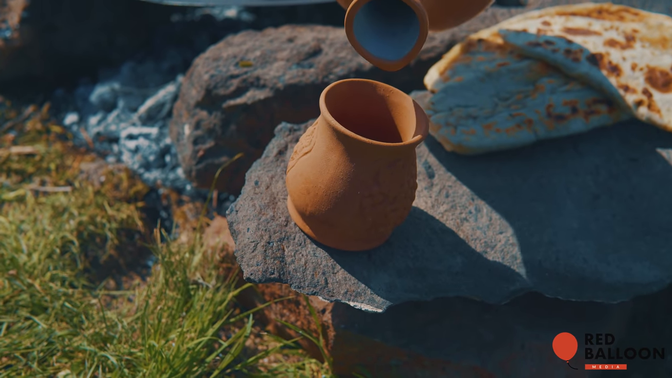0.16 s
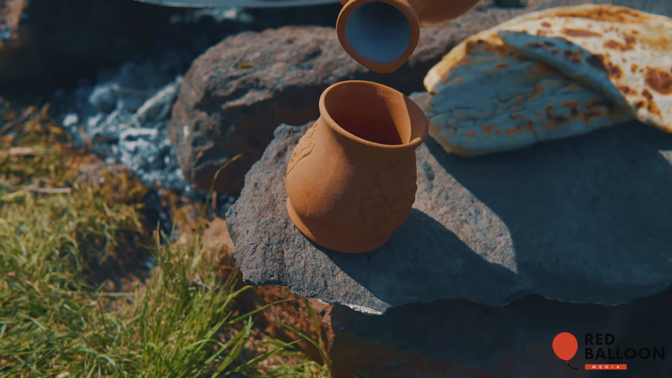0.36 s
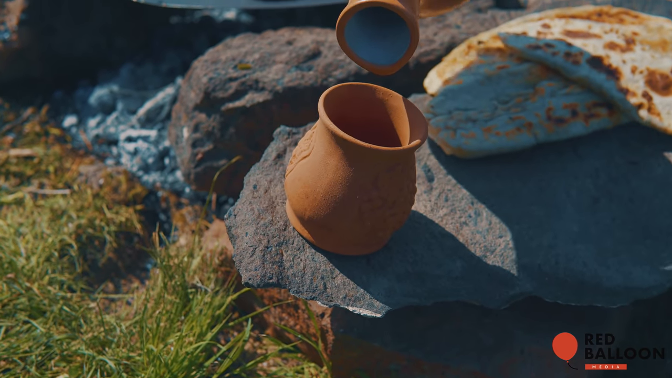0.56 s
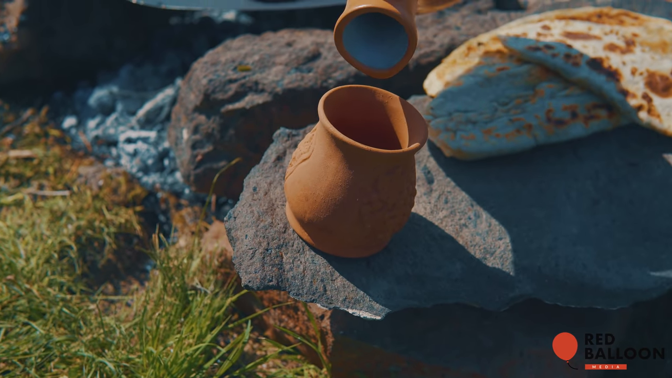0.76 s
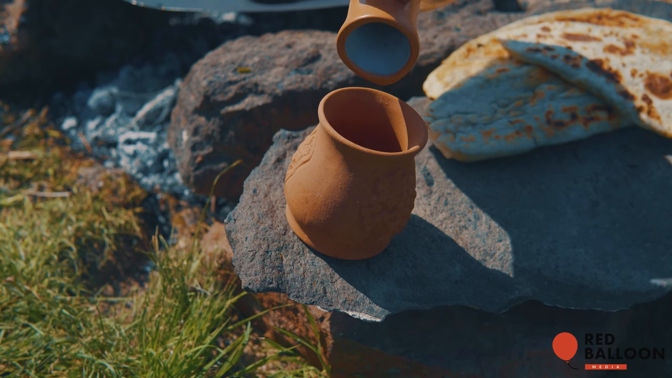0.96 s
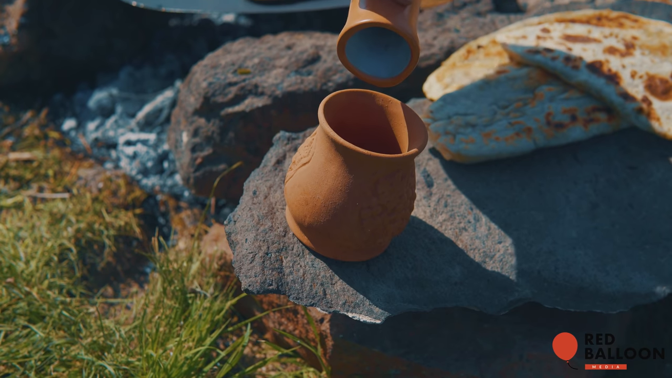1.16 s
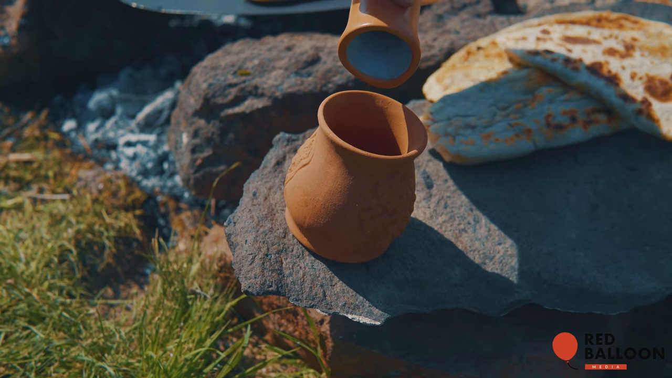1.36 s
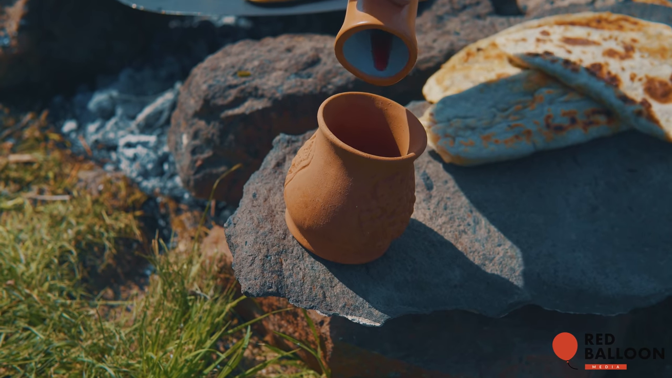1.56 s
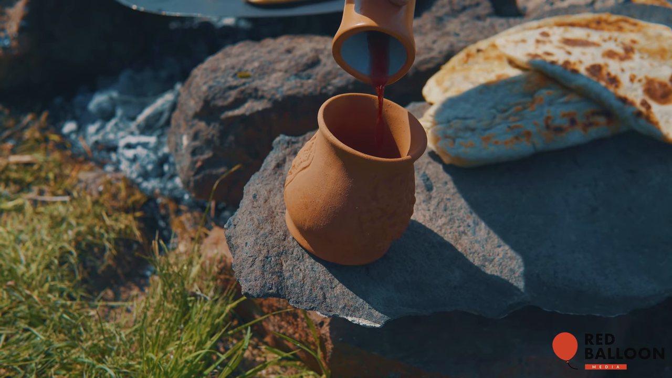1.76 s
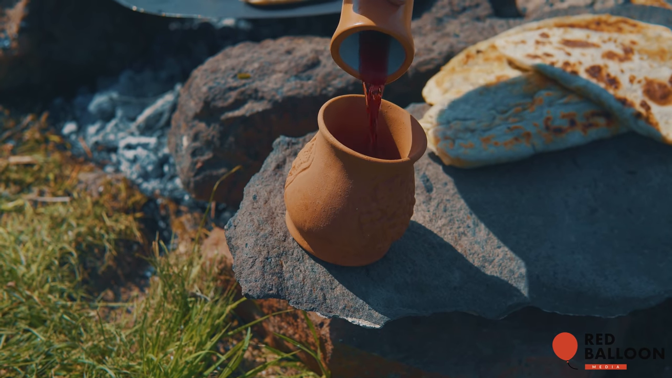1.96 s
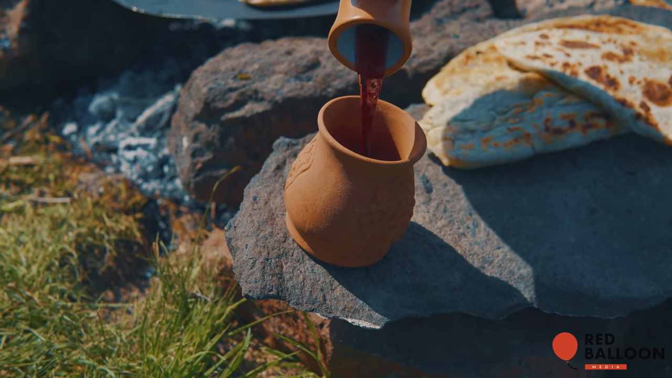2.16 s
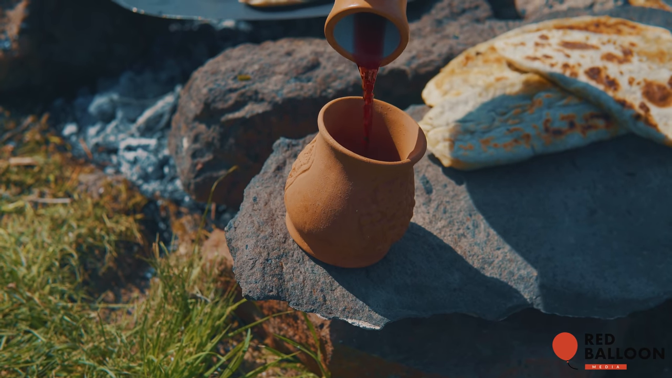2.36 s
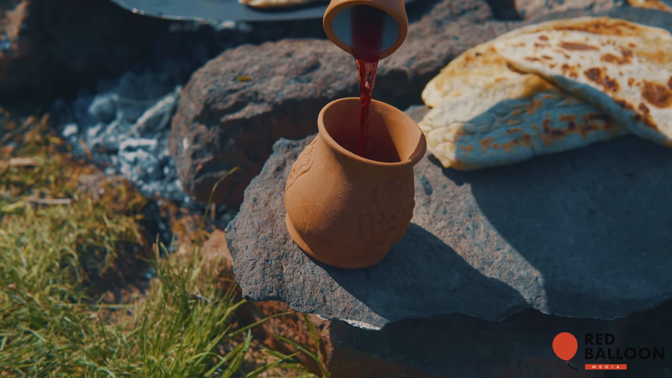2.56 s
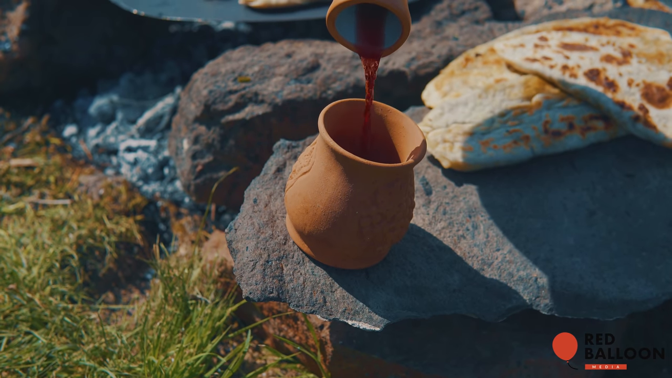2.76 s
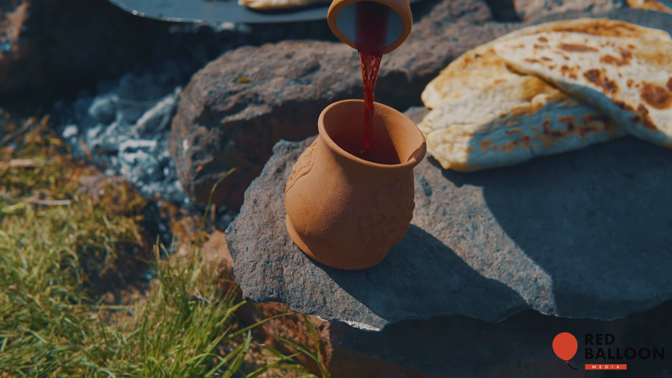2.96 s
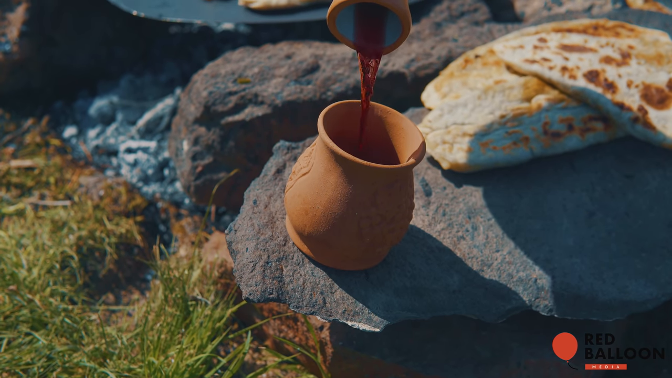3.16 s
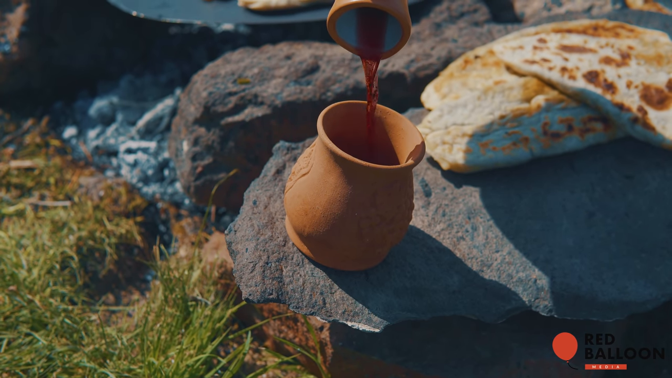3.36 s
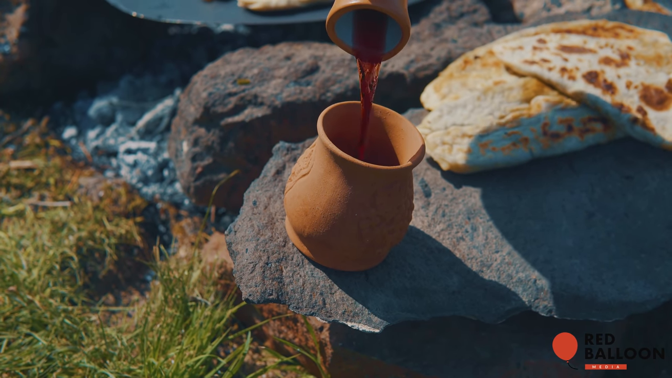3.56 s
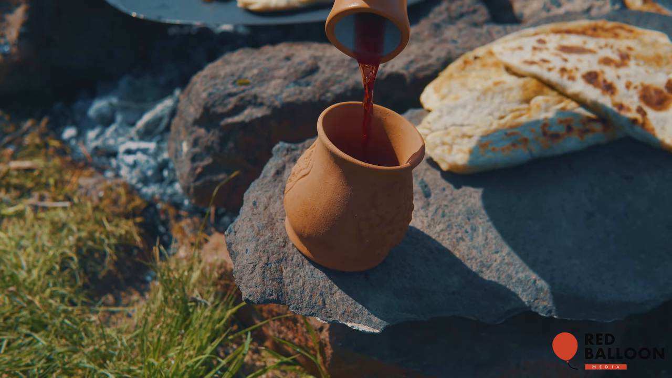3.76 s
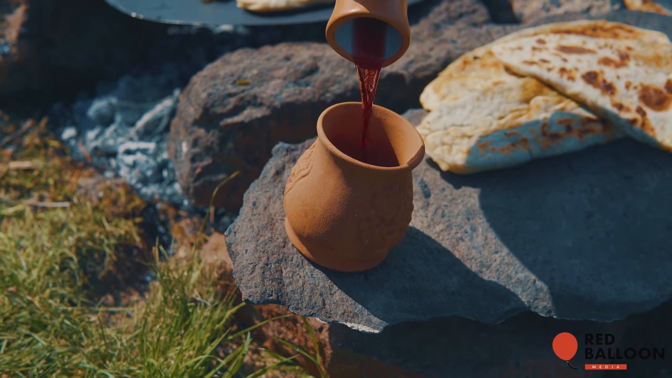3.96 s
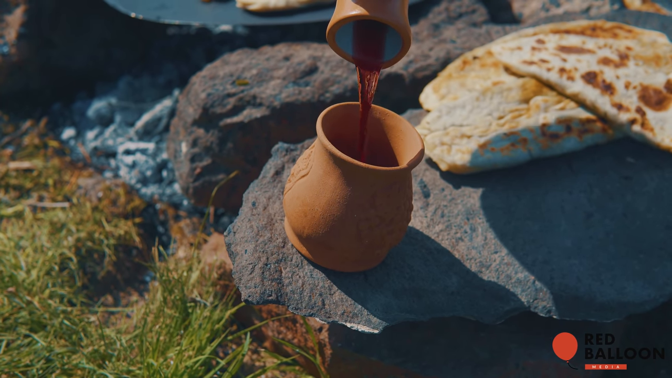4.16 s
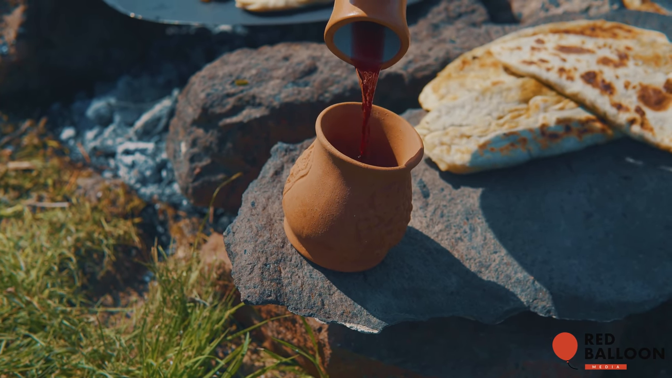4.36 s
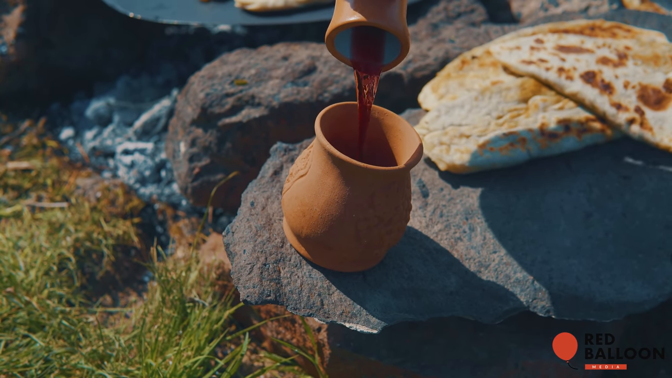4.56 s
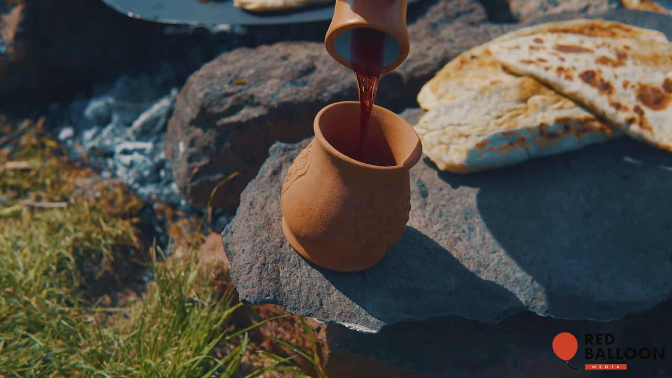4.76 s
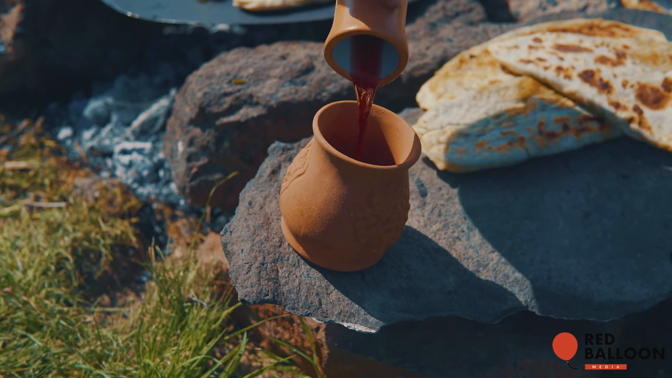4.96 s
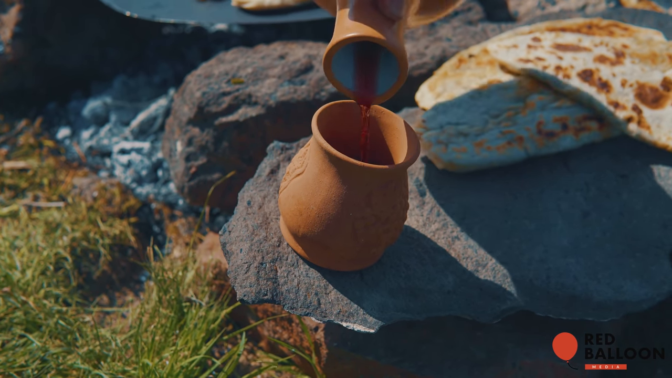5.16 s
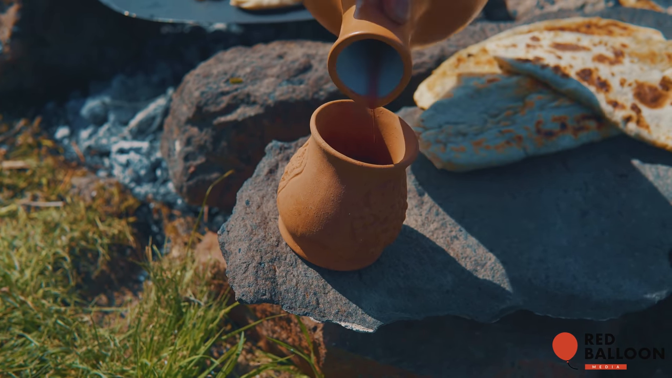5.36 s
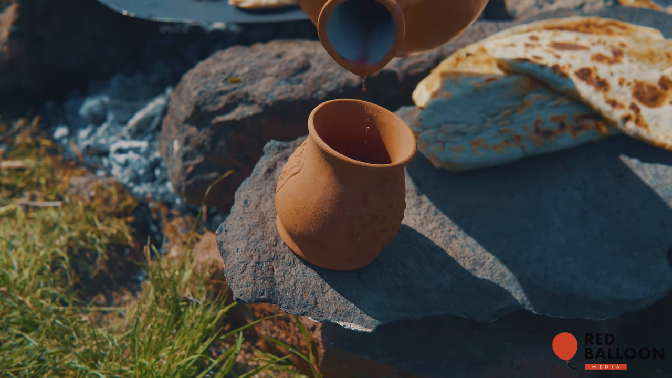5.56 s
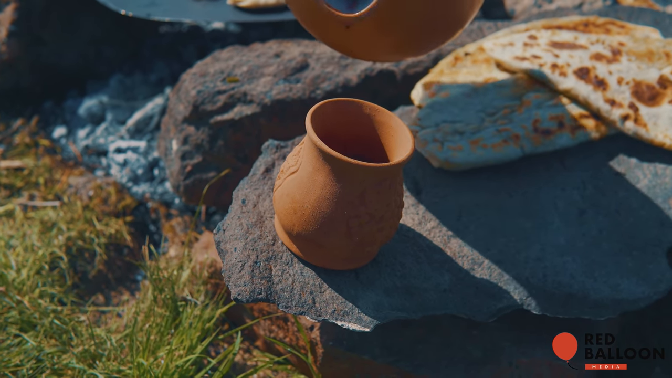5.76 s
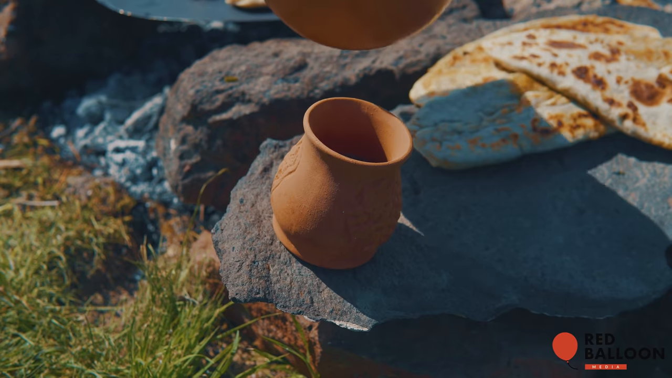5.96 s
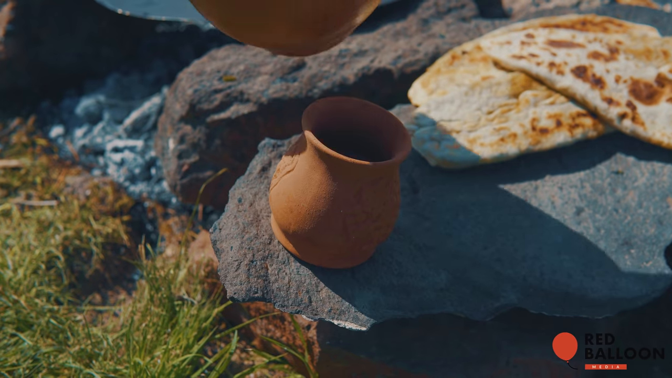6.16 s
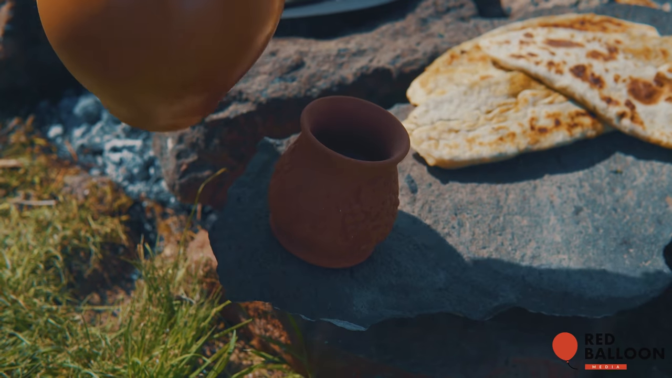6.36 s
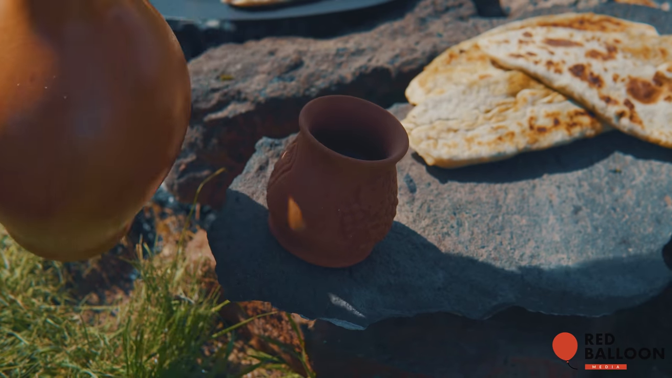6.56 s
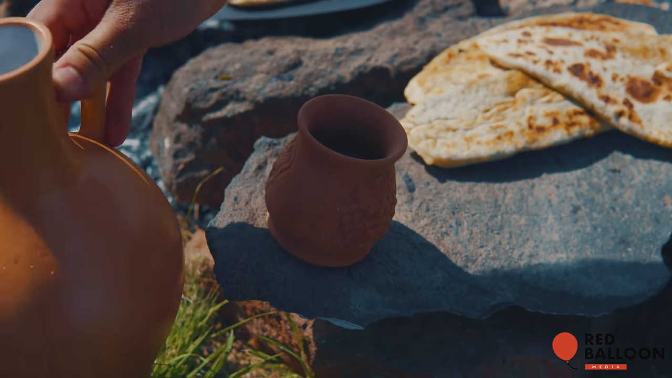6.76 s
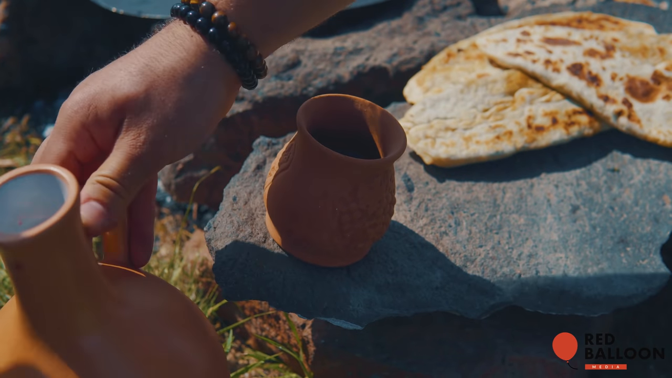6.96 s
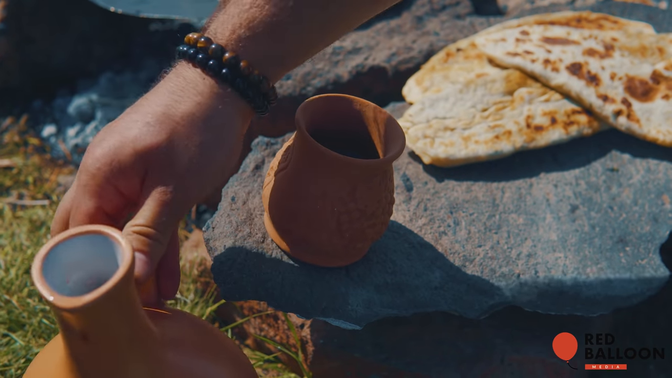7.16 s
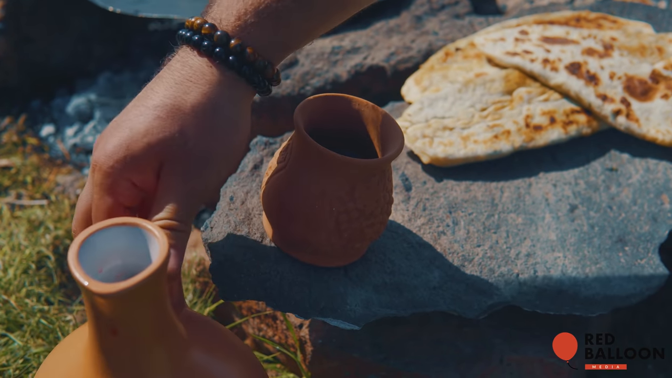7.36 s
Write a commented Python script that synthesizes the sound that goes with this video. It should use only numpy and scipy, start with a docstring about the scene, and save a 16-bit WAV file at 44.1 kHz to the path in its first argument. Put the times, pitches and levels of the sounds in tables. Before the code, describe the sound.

A close, quiet pour into a small clay cup, with a hard surface nearby giving a short dull echo. From 0 to 1.8 s there is only faint hiss, low murmur, slight electric hum and soft low puffs of air. At about 1.85 s a sharp tick of a first drop, then sparse tiny ticks and a faint knock near 2.2 s. Around 2.4 s the stream strikes bare clay with bright crackle and short rising glugs; by 3 s it splashes fully, then settles from 3.4 to 5.2 s into rounded gurgling and plops, fizz thinning, the cup's hollow pitch gradually rising while deeper bubbling sinks. Between 5.2 and 5.5 s it breaks into distinct plops, with last weak drips to 5.65 s. From 6 to 7.4 s fingers lightly knock and rub the jug, small dry ceramic clinks, densest at 6.3-6.85 s, with soft arm rustle and air puffs.

```python
"""A quiet room with a hard surface nearby: a drink is poured from a clay jug into a small clay cup, heard close.
Swarms of decaying sines make gurgle and splash, single ones plop and tick; gliding resonances follow the filling.
Fingers knock and rub the jug, mostly after the last drops: struck clay modes, and noise through the same modes.
Under it lie hiss, a low murmur, electric hum, puffs of draught and the rustle of an arm, from noise and sines."""
import sys
import numpy as np
from scipy import signal
from scipy.fft import rfft, irfft, next_fast_len
from scipy.io import wavfile
from scipy.ndimage import uniform_filter1d

SR = 44100
rng = np.random.default_rng(int(sys.argv[2]) if len(sys.argv) > 2 else 0)


def transcribe(u):
    """Save the signal u as a 16-bit wav file named by the first command-line argument.

    u: samples, shape (n,) or (channels, n), limited to [-1, 1]; the rate is SR.
    q: integer samples, one column per channel.
    """
    v = np.clip(np.atleast_2d(u).T, -1, 1)
    q = np.round(v * 32767).astype(np.int16)
    wavfile.write(sys.argv[1], SR, q)


N = 327354
TIME = np.arange(N) / SR

# The stream, on bare clay, into a deepening pool, then dribbling out.
# Each row: time in seconds, gurgle level in dB, splash level in dB, both before trims.
STREAM = [(2.34, -88, -84), (2.4, -81, -60), (2.48, -70.5, -64), (2.55, -54, -59.5), (2.65, -56.5, -64),
          (2.71, -69, -56.5), (2.8, -56.5, -61.5), (3.11, -55, -52), (3.27, -56, -64), (3.48, -49, -58),
          (3.59, -56.5, -60.5), (3.83, -52, -62), (4.14, -52.5, -62.5), (4.35, -57, -67.5),
          (4.62, -53, -62.5), (4.74, -57.5, -66.5), (5.3, -53.5, -64), (5.38, -69, -68), (5.66, -75, -76.5)]
# The filling cup. Each row: time in seconds, pitch of the air over the liquid in Hz, pitch of the bubble
# cloud in Hz, drive of the low resonances in dB, drive of the clay wall in dB.
FILLING = [(1.8, 800, 720, -4, 7.5), (2.5, 853, 880, -11, 1.5), (3.4, 882, 703, -6.5, 2.5),
           (3.9, 926, 580, 8.5, -1), (4.4, 940, 536, 9, 5), (4.8, 1143, 483, 4, 2),
           (5.3, 1227, 442, 6.5, -7), (5.45, 1210, 450, -11, -7)]
# Clay modes of the jug. Each row: frequency in Hz, relative level in dB, t60 in seconds.
JUG_MODES = [(2660, 0.5, 0.1), (2730, 0, 0.091), (3070, 0.5, 0.14), (3530, 4, 0.14), (3470, -8, 0.089),
             (3560, 0.5, 0.063), (4314, 3, 0.035), (4850, -6, 0.17), (5260, -5.5, 0.047), (5210, 2, 0.083),
             (5700, 7, 0.1), (6270, 5, 0.052), (7000, -5, 0.16), (7160, 0, 0.12), (7650, 5, 0.063),
             (8840, 7, 0.076)]


def gain_of(db):
    """Decibels to amplitude."""
    return 10 ** (np.asarray(db) / 20)


def evened(x):
    """Scales to rms 1."""
    return x / np.sqrt(np.mean(x ** 2) + 1e-20)


def steadied(x, size=4400):
    """Scales to rms 1 over about a tenth of a second; quicker bursts remain."""
    power = signal.oaconvolve(x ** 2, np.hanning(2 * size) / size, "same")
    return x / np.sqrt(abs(power) + 1e-20)


def read(points, hz):
    """Reads a table on a log-frequency axis."""
    f, value = np.transpose(points)
    return np.interp(np.log(hz + 1), np.log(f + 1), value)


def level(rows, axis=1):
    """One dB column of a curve as a gain per sample, silent outside it."""
    rows = np.array(rows, float)
    return gain_of(np.interp(TIME, rows[:, 0], rows[:, axis], left=-np.inf, right=-np.inf))


def held(rows, axis=1):
    """One dB column of a curve as a gain per sample, held beyond its ends."""
    rows = np.array(rows, float)
    return gain_of(np.interp(TIME, rows[:, 0], rows[:, axis]))


def swells(rows, fade_s):
    """Gain per sample of events (s, length s, .., dB) that fade in, hold and fade out."""
    out = np.zeros(N)
    for s, length, *_, db in rows:
        inside = np.minimum(TIME - s, s + length - TIME)
        out += gain_of(db) * np.sin(np.pi / 2 * np.clip(inside / fade_s, 0, 1))
    return out


def wander(per_s):
    """Smooth chance of rms 1 that changes about per_s times a second."""
    steps = uniform_filter1d(rng.standard_normal(int(N / SR * 4 * per_s) + 8), 4)
    return evened(np.interp(TIME * 4 * per_s, np.arange(len(steps)), steps))


def add(mix, s, sound):
    """Mixes a sound in at a time."""
    part = mix[max(round(s * SR), 0):][:len(sound)]
    part += sound[:len(part)]


def colour(x, points, size=4096):
    """Causal minimum-phase filter with the given spectrum, so that attacks stay sharp."""
    log_gain = np.log(gain_of(read(points, abs(np.fft.fftfreq(size, 1 / SR)))))
    taps = np.fft.ifft(np.exp(np.conj(signal.hilbert(log_gain)))).real
    return signal.oaconvolve(x, taps[:size // 2])[:N]


def noise(points):
    """Steady noise of rms 1 with the given spectrum."""
    size = next_fast_len(N)
    spectrum = rfft(rng.standard_normal(size))
    spectrum = spectrum * gain_of(read(points, np.fft.rfftfreq(size, 1 / SR)))
    return evened(irfft(spectrum, size)[:N])


def resonate(x, hz, width_hz):
    """A resonance of gain 1 that follows the curve hz."""
    turn = np.exp(2j * np.pi * np.cumsum(hz) / SR)
    r = np.exp(-np.pi * width_hz / SR)
    # shift to 0 Hz, one-pole low-pass, shift back
    return 2 * (turn * signal.lfilter([1 - r], [1, -r], x / turn + 1e-18)).real


def ring(modes, size=12000):
    """Response to one tap: a sum of exponentially decaying modes (Hz, dB, t60 s)."""
    t = np.arange(size) / SR
    return sum(gain_of(db) * np.exp(-np.log(1000) * t / t60) * np.cos(2 * np.pi * hz * t)
               for hz, db, t60 in modes)


def hum():
    """Electric hum: steady sines."""
    # Each row: frequency in Hz, rms level in dB.
    partials = [(100, -65.5), (200, -85.5)]
    return sum(gain_of(db) * np.sqrt(2) * np.sin(2 * np.pi * (hz * TIME + rng.random()))
               for hz, db in partials)


def draught(fade_s=0.078, calm_db=-62):
    """Puffs of air at the microphone: low noise that swells over a calm level."""
    # Each row: start in seconds, length in seconds, level in dB.
    puffs = [(.27, 0.17, -54.5), (.86, 0.16, -54), (1.12, 0.099, -51), (2.9, 0.72, -53.5), (3.38, .16, -46),
             (4.78, 0.092, -49.5), (5.33, 0.16, -53), (5.53, 0.13, -50), (6.16, 0.096, -45),
             (6.25, 0.54, -53), (6.39, 0.15, -43.5), (6.78, 0.13, -42), (6.95, .55, -57.5)]
    # Each row: frequency in Hz, density in dB per Hz.
    air_colour = [(8, -8), (22, -1.5), (36, 0), (55, -6.5), (80, -12), (120, -33), (200, -42), (500, -59.5)]
    return np.hypot(gain_of(calm_db), swells(puffs, fade_s)) * steadied(noise(air_colour))


def arm_rustle():
    """The arm's soft rustle as it carries the jug away: shaped noise."""
    # Each row: time in seconds, level in dB.
    rustle = [(5.8, -67.5), (6.2, -72.5), (6.6, -68.5), (7.0, -67.5), (7.42, -78)]
    return level(rustle) * noise([(60, -9.5), (150, -1.5), (260, -29.5), (700, -17.5), (1800, -30.5), (8000, -33)])


def background(hiss_db=-69.5, murmur_db=-69.5):
    """Even hiss and a low murmur of air as steady noise, with hum, draught and the moving arm."""
    # Each row: frequency in Hz, density in dB per Hz.
    hiss_colour = [(76, -32), (130, 3.5), (166, -3), (207, -10), (228, -9.5), (268, -8.5), (554, -14.5),
                   (706, -12.5), (796, -15), (2720, -19), (3330, -19), (6470, -19.5), (15100, -19),
                   (16000, -34.5)]
    hiss = gain_of(hiss_db) * noise(hiss_colour)
    murmur = gain_of(murmur_db) * noise([(40, -18), (80, 0.5), (115, 1.5), (150, -7), (220, -16.5), (500, -69)])
    return hiss + murmur + hum() + draught() + arm_rustle()


def jug_knocks(scuff_s=0.0055, soft_finger_s=0.0016):
    """Fingers knock the jug: its modes ring strongest around one frequency, with a dry noise scuff."""
    # Each row: start in seconds, peak level in dB, frequency in Hz around which it rings most,
    # dB lost an octave from there, scuff level in dB before colouring, pitch factor of the grip.
    knock_rows = [(2.215, -59, 2860, 38, -66, 0.95), (5.997, -53, 2660, 28, -55, 1.02),
                  (6.182, -66.5, 3470, 25, -74, 0.91), (6.345, -57, 3400, 0, -65, 1.02),
                  (6.436, -48, 3180, 5, -71, 0.98), (6.576, -53, 5700, 27, -55, 1),
                  (6.609, -51.5, 3030, 23, -52, 1), (6.701, -65, 2660, 27, -53.5, 1.1),
                  (6.843, -57.5, 3570, 35, -74, .985), (7.384, -57, 5500, 1, -65, 1.1)]
    # Each row: frequency in Hz, density in dB per Hz.
    scuff_colour = [(200, -12), (800, -3), (1400, 3.5), (1900, 7.5), (2500, 3), (3200, -2), (8000, -6),
                    (16000, -20)]
    knocks, scuffs, t = np.zeros(N), np.zeros(N), np.arange(12000) / SR
    for s, db, hz, focus_db, scuff_db, shift in knock_rows:
        modes = [(f * shift, mode_db - focus_db * abs(np.log2(f / hz)) ** .5, t60)
                 for f, mode_db, t60 in JUG_MODES]
        tone = ring(modes) * (1 - np.exp(-t / soft_finger_s))
        add(knocks, s, gain_of(db) * tone / abs(tone).max())
        add(scuffs, s, gain_of(scuff_db) * rng.standard_normal(len(t)) * np.exp(-t / scuff_s))
    return knocks + colour(scuffs, scuff_colour)


def jug_rubs(fade_s=0.031, grip_detune=0.0114, dull_db_per_octave=7):
    """Fingers slide on the jug: friction noise drives its modes, which the shifting grip favours by turns."""
    # Each row: start in seconds, length in seconds, level in dB.
    rubs = [(6.18, 0.22, -76.5), (6.34, 0.21, -70.5), (6.55, 0.099, -65), (6.82, 0.063, -72.5),
            (6.97, 0.31, -72), (7.32, .14, -70)]
    friction, sung = rng.standard_normal(N), np.zeros(N)
    for hz, db, t60 in JUG_MODES:
        grip = wander(per_s=7)
        favour_db = db + 6 * np.clip(grip, -2, 1) - dull_db_per_octave * np.log2(hz / 3000)
        width_hz = np.log(1000) / np.pi / t60
        sung += gain_of(favour_db) * resonate(friction, hz * (1 + grip_detune * grip), width_hz)
    return swells(rubs, fade_s) * steadied(sung)


def bubble(hz, ring_ms, rise=0.0036):
    """A trapped bubble swells, rings and dies; its pitch creeps up as it nears the surface."""
    life_s = ring_ms / 1000
    u = np.arange(int(5 * life_s * SR) + 2) / (life_s * SR)  # time in lives
    swell = u ** .7 * np.exp(-u ** 1.4) * np.tanh(8 * u) / .43
    return swell * np.sin(2 * np.pi * np.cumsum(hz * (1 + rise * (u - 1))) / SR)


def swarm(per_s, low_hz, high_hz, cycles, spread_db, count=40):
    """Many small bubbles at random moments, most weak and a few strong."""
    size = gain_of(spread_db * np.minimum(rng.exponential(1, N), 3.5)) * (rng.random(N) < per_s / SR)
    size *= level(STREAM) > 0  # only while the stream runs
    kind, lives, out = rng.integers(0, count, N), rng.uniform(0.25, 2.34, count), np.zeros(N)
    for k, hz in enumerate(np.geomspace(low_hz, high_hz, count)):
        grain = evened(bubble(hz, 1000 * cycles * lives[k] / hz))
        for at in np.flatnonzero((kind == k) & (size > 0)):
            add(out, at / SR, size[at] * grain)
    return out


def depths(x, cloud_db, neck_db, cloud_width_hz=60, neck_hz=675., neck_width_hz=40):
    """Low resonances: the bubble cloud mostly sinks in pitch as it deepens, the neck of the cup stays put."""
    s, _, cloud_hz, *_ = np.transpose(FILLING)
    x = x * held(FILLING, axis=3)
    cloud = resonate(x, np.interp(TIME, s, cloud_hz), cloud_width_hz)
    neck = resonate(x, np.full(N, neck_hz), neck_width_hz)
    return gain_of(cloud_db) * cloud + gain_of(neck_db) * neck


def pocket(churn, width_hz=130, fade_s=0.036):
    """Glugs: the stream digs air pockets in the pool, resonances whose pitch climbs as they close."""
    # Each row: start in seconds, length in seconds, first pitch in Hz, last pitch in Hz, relative level in dB.
    glugs = [(2.483, 0.057, 1300, 1450, 14), (2.558, 0.14, 940, 1600, 7), (2.825, .14, 950, 1550, 13),
             (3.07, .11, 950, 1850, 12), (3.222, .16, 860, 1070, 6)]
    glide = []
    for s, length, first_hz, last_hz, _ in glugs:
        glide += [(s, first_hz), (s + length, last_hz)]
    return swells(glugs, fade_s) * resonate(churn, np.interp(TIME, *np.transpose(glide)), width_hz)


def gurgle(trim_db=-1.5, air_db=6, air_width_hz=110, pocket_db=5, pips_db=-9):
    """Churning bubbles sound the air in the cup, the depths and the pockets; small bubbles pip through."""
    # Each row: frequency in Hz, filter gain in dB.
    churn_colour = [(200, -27.5), (420, -12.5), (570, -10.5), (690, 0), (790, -1), (1050, 4.5), (1300, 2),
                    (1500, -1.5), (1750, 3), (1870, -4), (2250, -4.5), (2500, 6), (4000, -47.5)]
    s, air_hz, *_ = np.transpose(FILLING)
    churn = swarm(per_s=750, low_hz=514, high_hz=1995, cycles=0.72, spread_db=4.5)
    churn = evened(colour(churn, churn_colour))
    pips = swarm(per_s=260, low_hz=1100, high_hz=2570, cycles=8.7, spread_db=9)
    pips = evened(colour(pips, churn_colour))
    body = churn + gain_of(air_db) * resonate(churn, np.interp(TIME, s, air_hz), air_width_hz)
    body += gain_of(pocket_db) * pocket(churn)
    body += depths(churn, cloud_db=10.5, neck_db=-1) + gain_of(pips_db) * pips
    return level(STREAM, axis=1) * gain_of(trim_db) * steadied(body)


def splash(fine_db=-1.9, fine_fall_db_per_s=0.75, clump_db=4.5, hollow_db=-38):
    """Small bubbles crackle in clumps, the finest fizz less as the pool deepens; both sound the cup's hollow."""
    # Higher resonances of the air in the cup. Each row: frequency in Hz, relative level in dB, t60 in seconds.
    hollow_modes = [(2080, -12, .02), (2560, -5, .04), (3100, 0, .03), (3380, -6, .02), (4400, -7, .02),
                    (5300, -2, .016), (5650, -1, .02), (7300, -6, .016), (8320, 3, .022), (9560, -1, .022),
                    (10200, -4, .016)]
    # Each row of both colours: frequency in Hz, filter gain in dB.
    crackle_colour = [(1500, -19), (2100, -9), (2480, -18.5), (2750, -8.5), (3150, -2.5), (3750, -1.5),
                      (4600, -1), (5600, 3.5), (6400, -7.5), (7200, 0), (9000, -47)]
    spray_colour = [(5000, -34), (7000, -11), (8300, -5), (8900, -15), (9600, -7.5), (10800, -7.5),
                    (12000, -1), (15000, -7), (16000, 8)]
    clumps = gain_of(clump_db * wander(per_s=60))
    coarse = clumps * swarm(per_s=1500, low_hz=1900, high_hz=7500, cycles=2.2, spread_db=4.8)
    fine = clumps * swarm(per_s=1300, low_hz=6500, high_hz=16000, cycles=3.6, spread_db=5.5)
    hollow = gain_of(hollow_db) * ring(hollow_modes)
    coarse, fine = (x + signal.oaconvolve(x, hollow)[:N] for x in (coarse, fine))
    crackle = steadied(colour(coarse, crackle_colour))
    fizz_gain = gain_of(fine_db - fine_fall_db_per_s * (TIME - STREAM[0][0]))
    fizz = fizz_gain * steadied(colour(fine, spray_colour))
    return level(STREAM, axis=2) * (crackle + fizz)


def stray_plops(count=40, first_s=3.25, last_s=5.18, over_db=8, spread_db=2, scatter=.06, ring_ms=4.9):
    """Lesser large bubbles at random, tuned near the air in the cup; their strength follows the gurgle."""
    when, size, tune, life = rng.uniform(-1, 1, (count, 4)).T
    s = first_s + (last_s - first_s) * (np.arange(count) + .5 + when) / count
    db = np.interp(s, *np.transpose(STREAM)[:2]) + over_db + spread_db * size
    hz = np.interp(s, *np.transpose(FILLING)[:2]) * (1 + scatter * tune)
    return list(zip(s, db, hz, ring_ms * 2 ** life))


def stray_ticks(count=40, first_s=2.2, last_s=5.35, thinning=1.8, over_db=15.5, spread_db=3,
                low_hz=4500, high_hz=12500, cycles=2.7):
    """Lesser tiny bubbles at random; strength follows the splash, and they thin out as the pool deepens."""
    when, size, tune, life = rng.random((count, 4)).T
    s = first_s + (last_s - first_s) * ((np.arange(count) + when) / count) ** thinning
    flow_s, _, splash_db = np.transpose(STREAM)
    db = np.interp(s, flow_s, splash_db) + over_db + spread_db * (2 * size - 1)
    hz = low_hz * (high_hz / low_hz) ** (tune ** 2)
    return list(zip(s, db, hz, 1000 * cycles * 2 ** (2 * life - 1) / hz))


def plops(snap_db=-23, snap_ms=0.79, push_db=22):
    """Each distinct bubble starts with a tiny snap as the surface closes over it, and stirs the depths."""
    # Bubbles and drops that stand out.
    # Each row: start in seconds, peak level in dB, pitch in Hz, ring time in ms.
    distinct = [(1.832, -49, 14500, 0.43), (1.8324, -52, 750, 3.2), (1.859, -28, 5260, 0.81),
                (1.8592, -62.5, 715, 7.1), (2.0878, -47.5, 7600, 0.66), (2.1076, -52, 7250, 0.61),
                (2.147, -46, 10260, 1.1), (2.232, -61.5, 520, 4.7), (2.4062, -40, 4760, 2),
                (2.4604, -41, 8300, 0.79), (2.5297, -34, 1080, 1.16), (2.57, -40, 8300, 1.3),
                (2.6144, -36, 8260, 2.4), (2.6168, -29.5, 9770, 0.53), (2.633, -43.5, 1000, 3.2),
                (2.6702, -39.5, 835, 5.4), (2.7165, -39, 5260, 0.85), (2.7413, -38.5, 9400, .61),
                (2.7472, -45.5, 3120, 4.5), (2.749, -43, 1484, 3.4), (2.8553, -36, 1015, 2.8),
                (2.9419, -36, 13200, 0.81), (2.9429, -43.5, 1120, 3.7), (3.0052, -41, 2040, 1.5),
                (3.0066, -30.5, 5440, 0.33), (3.007, -43.5, 3070, 4.5), (3.0525, -32, 885, 4.8),
                (3.0748, -42, 3020, 5.7), (3.0851, -33.5, 940, 4.1), (3.0938, -32.5, 8030, 0.72),
                (3.104, -37, 12100, 1.2), (3.1613, -35.5, 4500, 0.59), (3.1669, -37.5, 1060, 2),
                (3.1972, -37, 902, 7.5), (3.2175, -35.5, 846, 5.6), (3.4168, -32.5, 850, 4),
                (3.4385, -34.5, 896, 4.8), (3.4717, -34.5, 840, 2.5), (3.4724, -36, 8050, 0.41),
                (3.5135, -27.5, 885, 6), (3.5328, -39.5, 894, 10), (3.586, -39.5, 915, 3.7),
                (3.6285, -28.5, 860, 2.7), (3.6566, -33.5, 910, 2.9), (3.657, -37.5, 10800, .1),
                (3.7074, -39, 704, 1.7), (3.818, -39.5, 12700, 0.082), (3.8268, -36.5, 850, 4.4),
                (3.8505, -36, 887, 4.1), (3.906, -38, 865, 2.2), (3.9324, -31, 910, 2.2),
                (4.0333, -32, 870, 3.2), (4.0605, -41, 940, 3), (4.1677, -43, 835, 1.7),
                (4.2315, -41.5, 1014, 10.4), (4.3261, -43.5, 10700, 0.77), (4.4557, -43.5, 945, 1.9),
                (4.4892, -43.5, 870, 1.4), (4.5392, -43, 835, 1.1), (4.5938, -36.5, 13600, .2),
                (4.5947, -39, 960, 1.54), (4.8206, -44, 1050, 5.9), (4.823, -43.5, 11100, 0.4),
                (4.8394, -38.5, 1170, 1.2), (4.9726, -40, 1190, 3.1), (5.0009, -36, 1100, 1.3),
                (5.1077, -38, 1140, 2), (5.1373, -42.5, 11340, 0.83), (5.189, -37, 1156, 4),
                (5.2166, -35.5, 1180, 2.4), (5.217, -42.5, 13000, 0.73), (5.2262, -35.5, 1200, 6),
                (5.2678, -41.5, 5770, 0.5), (5.2779, -32.5, 1250, 1.9), (5.282, -43, 3300, .58),
                (5.308, -34, 1150, 3.4), (5.3085, -40.5, 567, 1.7), (5.355, -40, 1155, 3.5),
                (5.405, -54, 2520, 10), (5.4166, -36, 1650, 0.45), (5.426, -31.5, 1510, 2.2),
                (5.454, -29.5, 1215, 2), (5.4639, -29, 1135, 4.1), (5.4886, -38, 1040, 3.2),
                (5.557, -60, 1100, 7.1), (5.579, -58, 1220, 6), (5.6031, -48, 7600, 0.57),
                (5.611, -52.5, 1570, 2.7), (5.642, -63, 1690, 4.9)]
    tones, snaps, pushes = np.zeros((3, N))
    u = np.arange(500) * 1000 / SR / snap_ms
    bubbles = list(distinct) + stray_plops() + stray_ticks()
    bursts = rng.standard_normal((len(bubbles), len(u))) * u * np.exp(1 - u)
    for (s, db, hz, ring_ms), burst in zip(bubbles, bursts):
        add(tones, s, gain_of(db) * bubble(hz, ring_ms))
        abruptness_db = read([(.2, 16.5), (2.5, -5), (7, -5)], ring_ms)  # short-lived bubbles snap harder
        add(snaps, s, gain_of(db + snap_db + abruptness_db) * burst)
        # one-sample impulse: large bubbles shove the liquid
        add(pushes, s, gain_of([db + push_db + abruptness_db]) * min(1, 1000 / hz) ** 2)
    snaps = colour(snaps, [(250, -19), (700, -7), (1400, -4), (2400, -9),
                           (3200, 1), (5500, 4), (6800, 6.0), (13000, 2.5)])
    pushes = colour(pushes, [(280, -19.5), (470, 0.0), (620, 0), (2000, 0)])
    return tones + snaps + depths(pushes, cloud_db=2.5, neck_db=3)


def cup(liquid, wall_db=-53):
    """The liquid sets the clay wall ringing, more or less freely as the cup fills."""
    # Clay modes of the cup. Each row: frequency in Hz, relative level in dB, t60 in seconds.
    wall_modes = [(2548, -3, .3), (2985, -2, .12), (3100, -3, .08), (3252, 0, .13), (4425, -7, .08),
                  (4810, -5, .1), (5184, -6, .14), (5640, -8, .07), (6961, -8, .12), (8320, -7, .07),
                  (8845, -3, .1), (9540, -9, .06)]
    wall = signal.oaconvolve(liquid * held(FILLING, axis=4), ring(wall_modes))[:N]
    return liquid + gain_of(wall_db) * wall


def room(x, wet_db=-17, size=11025, echo_s=.007, echo_gain=.36):
    """A hard surface nearby gives one dull echo that ribs the gurgle; a weak, short tail follows."""
    # Each row: frequency in Hz, t60 in seconds.
    decay = [(300, 0.37), (1000, 0.085), (4000, 0.09), (15000, 0.026)]
    taps = rng.choice([-1., 1.], size) * (rng.random(size) < 2500 / SR) * (np.arange(size) > .003 * SR)
    hz, t, z = signal.stft(taps, SR, nperseg=128)
    fade = np.exp(-np.log(1000) * t / read(decay, hz)[:, None])
    tail = signal.istft(z * fade, SR, nperseg=128)[1]
    out = x + gain_of(wet_db) * signal.oaconvolve(x, tail / np.linalg.norm(tail))[:N]
    add(out, echo_s, echo_gain * uniform_filter1d(x, size=19))
    return out


def scene():
    """The jug and the pour in the room, over the background."""
    jug = jug_knocks() + jug_rubs()
    pour = cup(plops() + gurgle() + splash())
    return (room(pour + jug) + background())[None]


def record(dry, edge_hz=15950):
    """A steep band limit."""
    taps = signal.firwin(401, edge_hz, window=("kaiser", 8), fs=SR)
    return signal.oaconvolve(dry, taps[None], "same")


dry = scene()
out = record(dry)
transcribe(out)
```